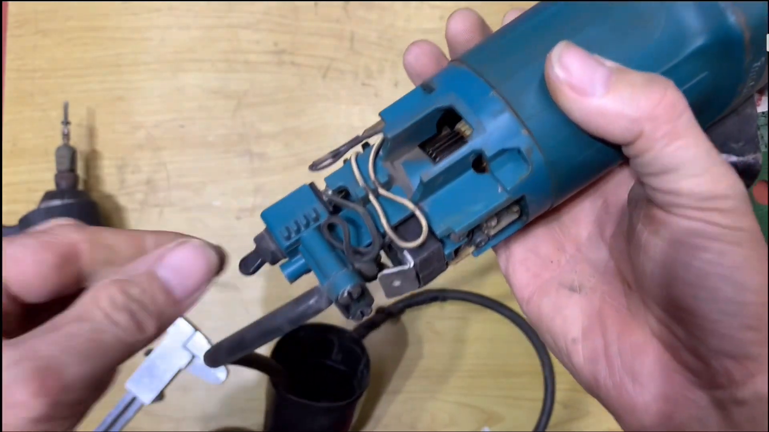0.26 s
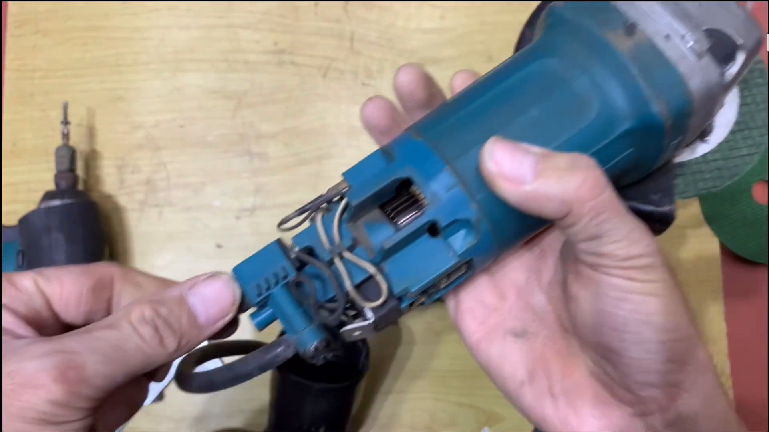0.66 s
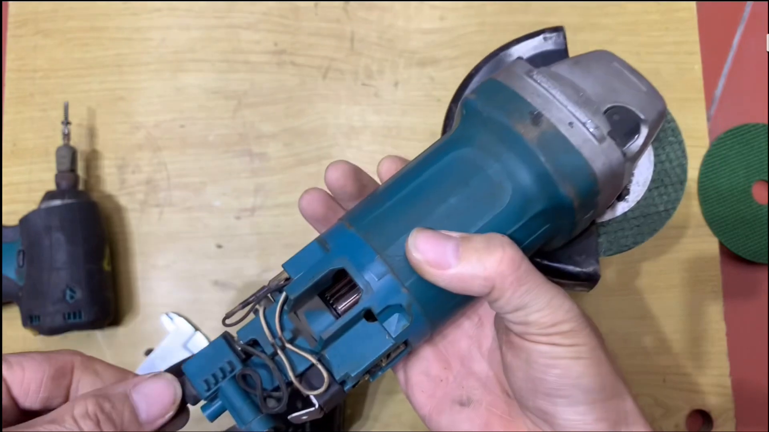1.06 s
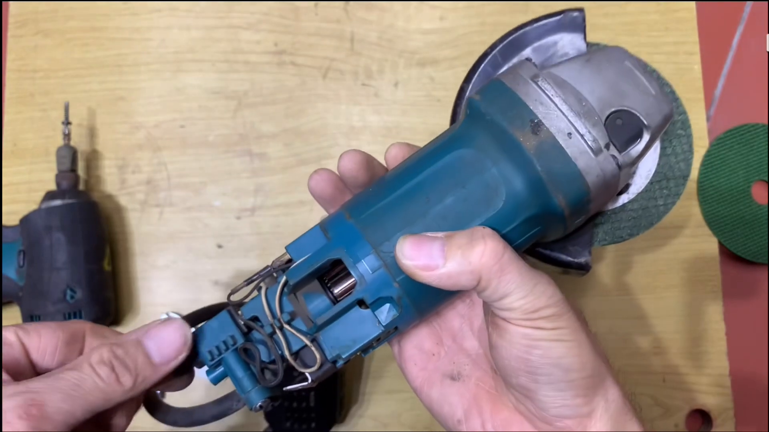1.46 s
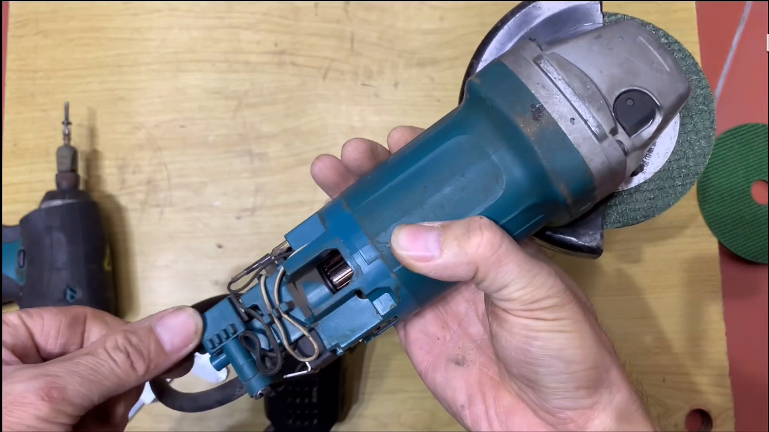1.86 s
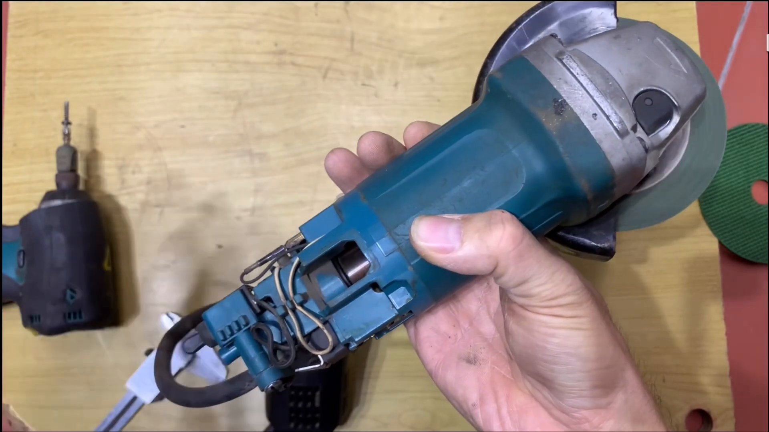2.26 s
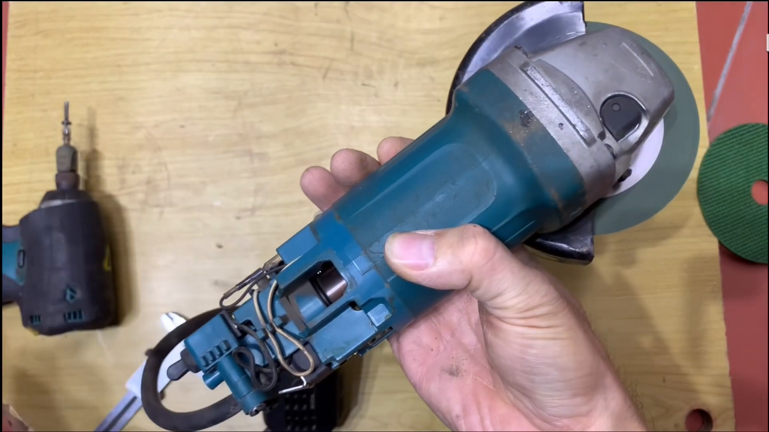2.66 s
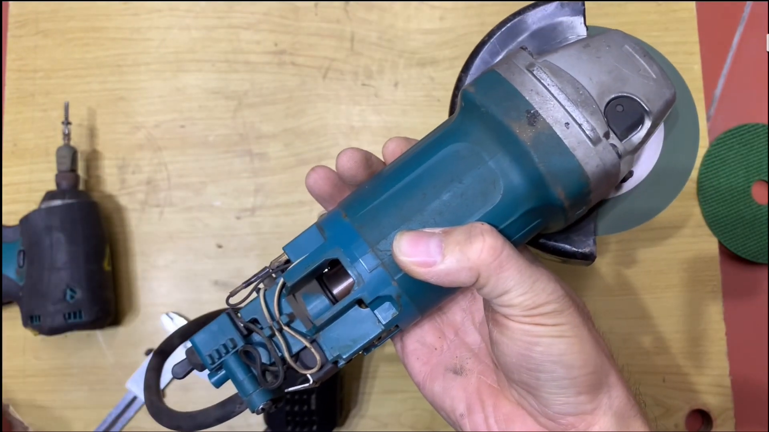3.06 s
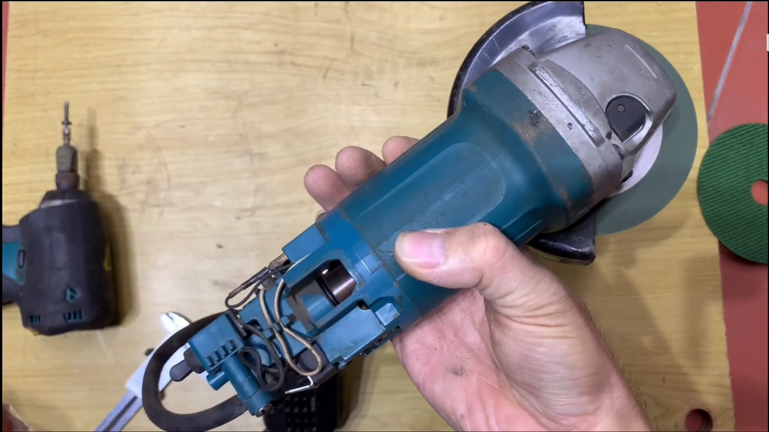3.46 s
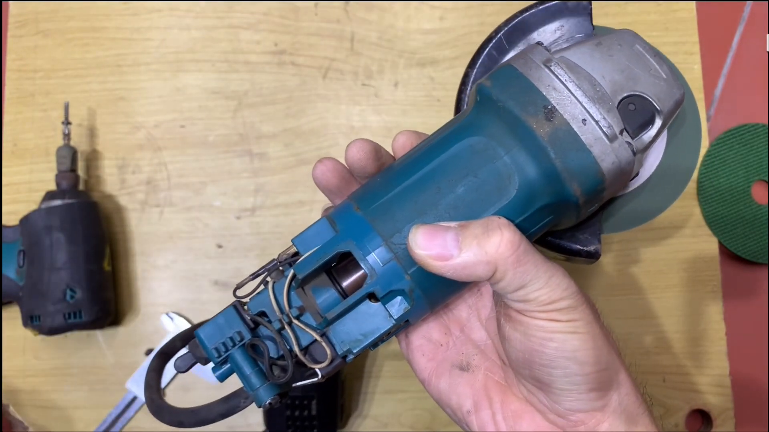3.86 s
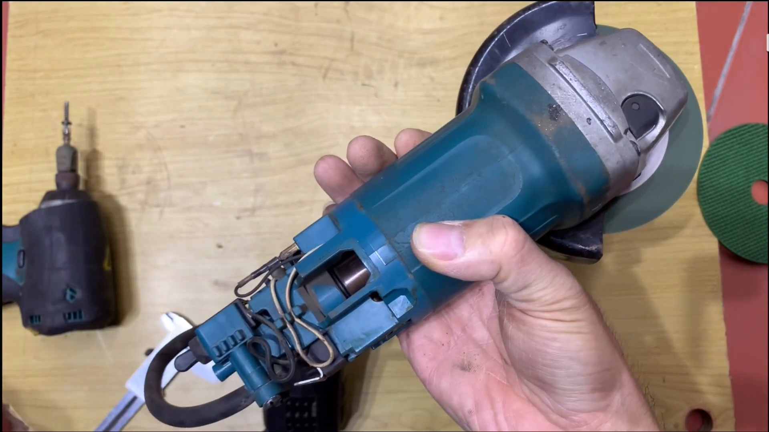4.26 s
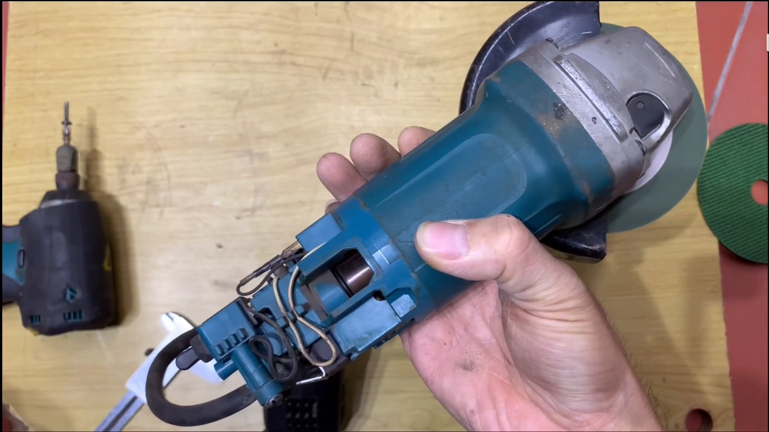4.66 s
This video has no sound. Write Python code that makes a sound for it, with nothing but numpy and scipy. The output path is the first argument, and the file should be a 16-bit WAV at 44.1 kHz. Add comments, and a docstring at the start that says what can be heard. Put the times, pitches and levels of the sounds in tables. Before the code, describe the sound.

A quiet indoor workshop, one close microphone, low humming room tone with faint hiss. In the first half second skin brushes softly on a plastic shell, with dull taps at about 0.2 and 0.4 seconds and a faint thin ring. Small, brighter finger ticks come between 1.2 and 1.4. At 1.6 a switch snaps, sharp and loud. Near 1.9 the grinder jolts with a hard clack, then quiet, uneven gear knocks follow, about a hundred a second, growing from 2.2 into a loud, bright metallic chatter until about 3.3. Meanwhile the pitch climbs quickly; the knocks melt into dense rattle, broad fan rush and several layered whines that swell as they sweep upward. From 3.5 the pulsing smooths out, and the climb slows towards a nearly steady, loud, high whine with roaring air, still running at the end at 4.8. Short room reverberation; loud peaks slightly clipped and the level turned down automatically.

```python
"""In a quiet workshop, a hand-held angle grinder starts up at one microphone. Fingers brush and tick on its shell,
the switch snaps, and a soft starter feeds the motor ever longer slices of mains. Each slice kicks the loose
gears into a knock of ringing modes. As the shaft speeds up the knocks melt into rattle (many small impacts),
fan air (shaped noise) and the whines of slots, commutator and fan (multiples of the shaft speed).
A gain control turns the loud tool down."""
import sys
import numpy as np
from scipy import signal
from scipy.io import wavfile
from scipy.ndimage import uniform_filter1d

SR = 44100
rng = np.random.default_rng(int(sys.argv[2]) if len(sys.argv) > 2 else 0)


def unload_wav(signal):
    """Save mono or channel-first audio to the path in sys.argv[1] as 16-bit WAV at rate SR, clipped to [-1, 1]."""
    wavfile.write(
        sys.argv[1],
        SR,
        np.round(np.clip(np.atleast_2d(signal).T, -1, 1) * 32767).astype(np.int16),
    )


def level_to_linear(level):
    """Convert decibel levels to linear amplitude factors, elementwise."""
    exponent = np.asarray(level, float) / 20
    return 10 ** exponent


N = 212076
T = np.arange(N) / SR

KICK_HZ, KICK_S = 100.35, 3.5221  # current slices a second, and the time of one of them in seconds
EDGE_HZ = 15750  # top of the recorded band

# The soft starter. Each row: time in seconds, depth of the pulsing from 0 to 1, lag of the kick in seconds.
STARTER = [(1.9, .95, .0038), (3.1, .95, .0036), (3.24, .95, .0022), (3.32, .95, 0), (3.65, .95, 0),
           (3.8, .5, 0), (4.1, .2, 0), (4.81, .05, 0)]
# The hardest slams of the gear teeth across their play. Each row: start in seconds, level in dB,
# treble modes against low modes in dB.
SLAMS = [(1.884, -14.5, .5), (1.8906, -17.5, -2), (1.9298, -23.5, -4), (1.9997, -31, -14),
         (2.0518, -26.5, -5), (2.0683, -29.5, 3), (2.0888, -27.5, -10), (2.0995, -26.5, -4.5),
         (2.1402, -21, -5.5), (2.162, -25.5, -6), (2.2114, -26, -3.5), (2.219, -19, -5),
         (2.2316, -21, -3.5), (2.2381, -20.5, -1), (2.249, -17.5, -8), (2.2618, -20.5, -4),
         (2.2688, -20, -12), (2.2932, -19, -2), (2.3139, -16.5, -3), (2.3294, -14, 5), (2.3598, -11, -1),
         (2.3664, -16.5, 2.5), (2.3827, -16, -3.5), (2.3988, -13, -.5), (2.4097, -11.5, 1),
         (2.4198, -11, -2), (2.448, -12, .5), (2.46, -11, 1), (2.4804, -12.5, 5), (2.5008, -16, -2.5),
         (2.5203, -11.5, -6), (2.548, -8, 4.5), (2.6303, -9.5, 3), (2.6576, -5, 4), (2.6773, -8.5, -1),
         (2.7772, -3, 7), (2.7977, -4.5, 2), (2.8065, -4, 1), (2.8273, -7, 10), (2.8546, -8, -1.5),
         (2.9262, -6, -5.5), (2.9757, -8, -13), (2.996, -1.5, 4), (3.0368, -11, -12), (3.0768, -12, -8),
         (3.0867, -1, -6), (3.1348, -8, 0), (3.2033, -5.5, -5), (3.2441, -3, 8), (3.2745, -1.5, -5)]
# Modes of the gear housing. Each row: frequency in Hz, nominal width in Hz, relative strength in dB.
GEAR_HOUSING = [(593, 64, -15.5), (865, 16, -25.5), (1069, 73, -10.5), (1454, 50, -10), (2354, 350, 5.5),
                (2984, 180, 5.5), (3278, 210, 5.5), (4000, 700, 0), (4680, 198, 0.5), (5045, 83, -6.5),
                (7160, 1060, 2.5), (9200, 340, -9.5), (10150, 250, -9.5), (15800, 240, -10)]
# The shaft runs up. Each row: time in seconds, speed in turns a second.
SHAFT_SPEED = [(1.88, 2), (2.15, 25), (2.4, 70), (2.6, 117.7), (2.86, 192), (2.97, 229), (3.1, 275.1),
               (3.2, 304.6), (3.3, 330.3), (3.4, 353.1), (3.5, 373.2), (3.6, 390.9), (3.75, 413.8),
               (3.9, 434), (4.05, 450.7), (4.2, 464.3), (4.35, 475.8), (4.55, 488.8), (4.81, 499.1)]


def evened(x):
    """Scales to rms 1."""
    return x / np.sqrt(np.mean(x ** 2) + 1e-20)


def read(points, hz):
    """Reads a table on a log-frequency axis."""
    f, value = np.transpose(points)
    return np.interp(np.log(hz + 1), np.log(f + 1), value)


def curves(rows):
    """Every column of a table after the time, as a curve over all samples."""
    s, *columns = np.transpose(rows)
    return [np.interp(T, s, column) for column in columns]


def add(mix, s, sound):
    """Mixes a sound in at time s."""
    part = mix[round(s * SR):][:len(sound)]
    part += sound[:len(part)]


def slow(hz):
    """Slow random wander of rms 1: noise low-passed at hz."""
    return evened(signal.lfilter(*signal.butter(2, hz, fs=SR), rng.standard_normal(N)))


def band(x, hz, octaves, order):
    """Band-pass so many octaves either side of hz."""
    edges = np.clip([hz / 2 ** octaves, hz * 2 ** octaves], 100, 20000)
    return signal.sosfilt(signal.butter(order, edges, "band", fs=SR, output="sos"), x)


def hiss(field_db, patchy_db, size):
    """Random short-time spectra; field_db(hz, s) gives the colour, blurred patches make it live; rms 1."""
    hop = size // 4
    real, imaginary, patches = rng.standard_normal((N // hop + 5, size // 2 + 1, 3)).T
    patches = uniform_filter1d(patches, 9, 0)
    patches = evened(uniform_filter1d(patches, 9, 1))
    hz = np.fft.rfftfreq(size, 1 / SR)[:, None]
    s = np.arange(real.shape[1])[None] * hop / SR
    spectra = (real + 1j * imaginary) * level_to_linear(field_db(hz, s) + patchy_db * patches)
    return evened(signal.istft(spectra, nperseg=size, noverlap=size - hop)[1][:N])


def crack(noise, decay_s, rise_s):
    """A few milliseconds of noise; peak 1."""
    t = T[:len(noise)]
    burst = noise * np.exp(-t / decay_s) * (1 - np.exp(-(t / rise_s) ** 2))
    return burst / abs(burst).max()


def blow(modes, draw, treble_db=0, rise_s=0.0003):
    """One blow rings every mode with its own chance strength, tuning and phase; peak 1."""
    t = T[:1500, None]
    hz, width, db = np.transpose(modes)
    strength, tuning, phase = draw[:, :len(hz)]
    db = db + 2 * strength + treble_db * (hz > 4000)
    decay = np.exp(-np.pi * width * t)
    swing = np.sin(2 * np.pi * (hz * (1 + 0.034 * tuning) * t + 0.13 * phase))
    ring = (level_to_linear(db) * decay * swing).sum(1)
    ring = ring * (1 - np.exp(-(t[:, 0] / rise_s) ** 2))
    return ring / abs(ring).max()


def throb(sharp):
    """The chopped current as a loudness pattern of mean power 1; higher sharp narrows each pulse."""
    depth, lag = curves(STARTER)
    pulse = np.exp(sharp * (np.cos(2 * np.pi * KICK_HZ * (T - lag - KICK_S)) - 1))
    return np.sqrt(1 - depth + depth * evened(pulse) ** 2)


def decades():
    """Speed against full speed (500 turns a second) in factors of ten, negative below it."""
    return np.log10(curves(SHAFT_SPEED)[0] / 500)


def room(x):
    """Sparse taps of random sign that swell in as the walls answer, each band dying at its own speed."""
    # Each row: frequency in Hz, time to fall by 60 dB in seconds.
    decay_times = [(500, .5), (2200, .55), (6000, .45), (14000, .36)]
    taps = np.zeros(SR // 2 + 40)
    at = np.arange(250, SR // 2, 10)
    swell = np.minimum(at / SR / .022, 1)
    taps[at + rng.integers(0, 10, len(at))] = rng.choice([-1., 1.], len(at)) * swell
    hz, t, spectra = signal.stft(taps, SR, nperseg=256)
    fade_db = -60 * t / read(decay_times, hz)[:, None]
    tail = signal.istft(spectra * level_to_linear(fade_db), SR, nperseg=256)[1]
    return signal.fftconvolve(x, tail / np.linalg.norm(tail))[:N]


def background():
    """Room tone: a lumpy low drone over faint hiss, both drifting slowly in level."""
    # Colour of the room tone. Each row: frequency in Hz, relative level in dB per Hz.
    floor_colour = [(12, -25), (20, 0), (74, -16), (146, -0.5), (198, -17.5), (310, -10.5), (377, -17.5),
                    (499, -23), (574, -24.5), (738, -29), (1260, -37), (2910, -43.5), (16000, -50.5)]
    # Slow drift. Each row: time in seconds, change of the low drone in dB, change around 2.5 kHz in dB.
    floor_drift = [(0, -0.5, 9.5), (.18, 3, 8), (.3, -0.5, 6), (.5, 0.5, 6), (1.3, -1, 4),
                   (1.5, -4.5, -1.5), (4.81, -5.5, 27)]
    s_of, drone_db, middle_db = np.transpose(floor_drift)

    def field(hz, s):
        drone = np.exp(-((hz - 140) / 60) ** 2) * np.interp(s, s_of, drone_db)
        middle = np.exp(-(np.log2((hz + 1) / 2500) / 1.6) ** 2) * np.interp(s, s_of, middle_db)
        return read(floor_colour, hz) + drone + middle

    return level_to_linear(-40.5) * hiss(field, patchy_db=0.4, size=2048)


def skin_rubs():
    """Skin brushing the shell: soft swells of noise around one pitch."""
    # Each row: centre in seconds, half length in seconds, middle frequency in Hz, level at the centre in dB.
    brushes = [(.1, .045, 9000, -56), (.1, .04, 2200, -61), (.23, .04, 1800, -57), (.43, .06, 2000, -57)]
    out = np.zeros(N)
    for s, half, middle_hz, db in brushes:
        rub = hiss(lambda hz, when: -5 * np.log2((hz + 1) / middle_hz) ** 2, patchy_db=1.5, size=256)
        out += level_to_linear(db) * rub * np.exp(-((T - s) / half) ** 2)
    return out


def thin_rings():
    """Faint thin rings: single sines that swell and fade."""
    # Each row: start in seconds, length in seconds, frequency in Hz, peak in dB, share of it spent swelling.
    faint_rings = [(.28, .42, 3720, -62, .6), (1.29, .04, 2611, -60, .4), (1.34, .04, 2611, -60, .3),
                   (1.385, .09, 2611, -65, .2)]
    out = np.zeros(N)
    for s, length, hz, db, swell in faint_rings:
        t = T[:round(length * SR)]
        envelope = np.sqrt(np.interp(t / length, (0, swell, 1), (0, 1, 0)))
        add(out, s, level_to_linear(db) * np.sin(2 * np.pi * hz * t) * envelope)
    return out


def ticks():
    """Switch and fingers on the plastic shell: noise cracks and ringing modes, dry and as sent to the room."""
    # Each row: start in seconds, level in dB, centre of the crack in Hz, send to the room in dB.
    touches = [(.2099, -37, 2400, 13), (.38, -36, 2400, 13), (1.1994, -47, 4000, 0), (1.2336, -41, 8500, 0),
               (1.3044, -48, 5500, 0), (1.3374, -37, 9000, -2), (1.3748, -41, 4500, -2),
               (1.5674, -44, 4500, 0), (1.5913, -10, 7000, 0), (1.8774, -36, 8000, 0)]
    # Modes of shell and switch. Each row: frequency in Hz, width in Hz, relative strength in dB.
    shell_modes = [(490, 59, -20), (2220, 440, 1), (3480, 910, -17), (5240, 280, 6), (9400, 520, 16.5)]
    near, far = np.zeros(N), np.zeros(N)
    draws = rng.standard_normal((len(touches), 3, 500))
    for (s, db, hz, room_db), draw in zip(touches, draws):
        snap = crack(band(draw.ravel(), hz, octaves=1.1, order=1), decay_s=.0018, rise_s=.0009)
        bright_db = 12 * np.log2(hz / 7000)  # a dull touch hardly stirs the high modes
        ring = blow(shell_modes, draw, bright_db, rise_s=0.0021)
        add(near, s, level_to_linear(db) * (0.59 * snap + 0.46 * ring))
        # heard from all sides, the colour evens out
        sent = band(signal.unit_impulse(500), hz, octaves=1.5, order=1)
        add(far, s, level_to_linear(db + room_db) * sent)
    return near, far


def air():
    """Turbulent fan air through the vents, growing steeply with speed and brightening."""
    # Each row: frequency in Hz, relative level in dB per Hz.
    vent_colour = [(120, -65), (200, -19.5), (432, -16.5), (883, -12.5), (1080, -4.5), (1500, -6),
                   (1980, -2), (3020, -8.5), (3900, -12), (5000, -10), (6900, -2.5), (9600, -9),
                   (11800, -14.5), (12900, -12), (13500, -12), (14600, -6.5), (16000, -15)]
    slower = decades()

    def field(hz, s):
        # faster air hisses higher: 5 dB more growth for each octave up
        brighten = 5.0 * np.log2((hz + 1) / 3500) * np.maximum(np.interp(s, T, slower), -.6)
        return read(vent_colour, hz) + brighten

    rush = hiss(field, patchy_db=1.23, size=512)
    # 47 dB of growth for ten times the speed, with a slight wander
    return level_to_linear(-7.5 + 47 * slower + .5 * slow(6.3)) * rush


def rattle():
    """Dense small impacts, each mode shaken by its own train, bunched on the slices while teeth can part."""
    # Each row: time in seconds, level in dB.
    rattle_level = [(1.88, -42), (1.94, -61), (2.1, -48.5), (2.35, -44.5), (2.54, -25.5), (2.75, -23.5),
                    (2.96, -19), (3.27, -16.5), (4.0, -15.5), (4.81, -17)]
    slack = np.clip((3.5 - T) / .5, 0, 1)
    bunch = 1 - slack + slack * throb(sharp=1.0)
    out = np.zeros(N)
    t = T[:1500]
    for hz, width, db in GEAR_HOUSING:
        struck = rng.random(N) < 2500 / SR  # 2500 impacts a second on average
        hits = rng.standard_normal(N) * struck * bunch
        ring = np.exp(-np.pi * 1.3 * width * t) * np.sin(2 * np.pi * hz * t)  # damped faster than a slam
        out += level_to_linear(db) * signal.oaconvolve(hits, ring * np.sqrt(width))[:N]
    return level_to_linear(curves(rattle_level)[0]) * evened(out) * (T > rattle_level[0][0])


def whine():
    """Multiples of the shaft speed grow as it runs up, and swell where they sweep through the body's modes."""
    # Multiples of the shaft that sound: unbalance 1 and 2, ball pass 6, pinion 11, slots 12, bars 24,
    # blades 31, bars twice 48. One row of plain factors.
    shaft_orders = (1, 2, 6, 11, 12, 24, 31, 48)
    # One row for each multiple: level in dB at full speed ahead of any resonance,
    # growth in dB for ten times the speed.
    order_levels = [(-20, 72), (-40, 55), (-35.5, 20), (-40, 10), (-31, 12), (-32, 38), (-37, 45),
                    (-44, 10)]
    # Resonances of the body. Each row: frequency in Hz, width in Hz, lift in dB.
    body_modes = [(320, 70, 3), (830, 50, 7), (1000, 30, 18), (2300, 480, 13), (2980, 500, 13),
                  (4700, 850, 8), (6000, 160, 8), (11950, 500, 6), (14330, 550, 19)]
    # Iron ring that the slot tone sweeps through. One row: frequency in Hz, width in Hz, gain in dB.
    stator_ring = (4290, 200, 14.5)
    hz = curves(SHAFT_SPEED)[0]
    turns, out = np.cumsum(hz) / SR, np.zeros(N)
    slower = decades()
    ring_hz, ring_width, ring_db = stator_ring
    for order, (full_db, slope_db) in zip(shaft_orders, order_levels):
        lift_power = np.ones(N)
        for mode_hz, width, lift_db in body_modes:
            detuning = 2 * (order * hz - mode_hz) / width
            lift_power += level_to_linear(2 * lift_db) / (1 + detuning ** 2) ** 2
        waver = .03 * order * slow(40)  # radians; bearing play blurs the high orders most
        flutter_db = (1 + .08 * order) * slow(25)
        level = np.sqrt(lift_power) * level_to_linear(full_db + slope_db * slower + flutter_db)
        tone = level * np.sqrt(2) * np.sin(2 * np.pi * order * turns + waver)
        if order in (11, 12):  # pinion and slots follow the pulsing torque
            tone = tone * throb(sharp=4.5)
        if order == 12:
            ring = signal.lfilter(*signal.iirpeak(ring_hz, ring_hz / ring_width, SR), tone)
            tone = tone + level_to_linear(ring_db) * ring
        out += tone * (order * hz < EDGE_HZ)
    # below 175 turns a second the starter passes little current and the tones sink away
    return out / np.sqrt(1 + (175 / hz) ** 6)


def chatter():
    """Lists a knock for each current slice that has no hard slam, a little late and uneven; some are missed."""
    # Ordinary knocks. Each row: time in seconds, level in dB, treble modes against low modes in dB.
    ordinary = [(1.93, -38, -7), (2.18, -28, -15), (2.33, -25.5, -30), (2.55, -14, 7), (2.75, -11, 4.5),
                (2.9, -7.5, 0), (3.32, -13, -19)]
    early_s, late_s = .0022, .0014  # contact leads the loudest of the slice, and comes late by chance
    scatter_db, treble_scatter_db = 2.0, 3.0
    missed = .12  # share of slices that leave the teeth in touch
    s_of, db, treble_db = np.transpose(ordinary)
    slices = KICK_S - np.arange(1, 170) / KICK_HZ
    s_lag, _, lag = np.transpose(STARTER)
    slices = slices + np.interp(slices, s_lag, lag)
    late, miss, loudness, treble = rng.random((len(slices), 4)).T
    s = slices - early_s - late_s * np.log(1 - late)
    free = abs(slices[:, None] - np.transpose(SLAMS)[0]).min(1) > .55 / KICK_HZ
    keep = free & (miss > missed) & (s > 1.93) & (s < 3.32)
    loudness, treble = np.sqrt(12) * (np.array([loudness, treble]) - .5)  # even spread of rms 1
    knock_db = np.interp(s, s_of, db) + scatter_db * loudness
    knock_treble_db = np.interp(s, s_of, treble_db) + treble_scatter_db * treble
    return list(np.transpose([s, knock_db, knock_treble_db])[keep])


def knocks():
    """Single slams of the gear teeth: a bright crack at contact, then the housing rings."""
    out, draws = np.zeros(N), rng.standard_normal((220, 3, 300))
    for (s, db, treble_db), draw in zip(list(SLAMS) + chatter(), draws):
        add(out, s, level_to_linear(db) * blow(GEAR_HOUSING, draw, treble_db))
        noise = band(draw.ravel(), hz=8000, octaves=.42, order=2)
        contact = crack(noise, decay_s=.0017, rise_s=.0003)
        add(out, s, level_to_linear(db + treble_db / 2 - 17.5) * contact)
    return out


def scene():
    """All reaches one microphone; gears, rattle, air and room lose their deep bass on the small tool body."""
    near, far = ticks()
    gears = knocks()
    tool = gears + room(far + level_to_linear(-12) * gears) + rattle() + air()
    tool = signal.sosfilt(signal.butter(3, 260, "high", fs=SR, output="sos"), tool)
    mono = near + skin_rubs() + thin_rings() + tool + whine() + background()
    return np.array([mono, mono])


def roll_off(x):
    """The treble ends steeply here."""
    return signal.sosfilt(signal.butter(12, 17030, fs=SR, output="sos"), x)


def record(dry):
    """Gain control turns down once the tool is loud; peaks clip; then the band limit."""
    power = abs(uniform_filter1d(dry[0] ** 2, 8000, origin=3999))  # mean of the last 0.18 s
    power_db = 10 * np.log10(power + 1e-12)
    cut_db = .45 * np.maximum(power_db + 17, 0)
    ducked = np.clip(dry / level_to_linear(cut_db), -1, 1)
    low_pass = signal.firwin(511, EDGE_HZ, window=("kaiser", 9), fs=SR)
    limited = signal.oaconvolve(ducked, low_pass[None], "same")
    return roll_off(limited)


dry = scene()
out = record(dry)
unload_wav(out)
```